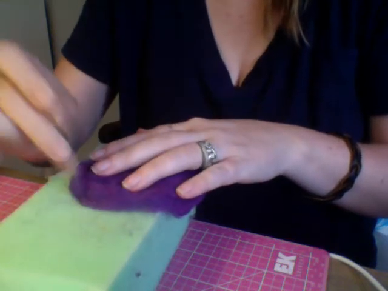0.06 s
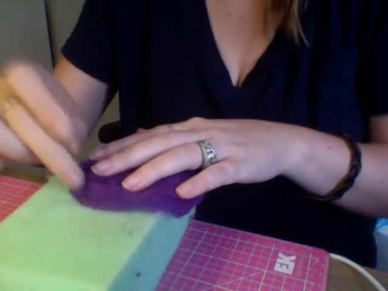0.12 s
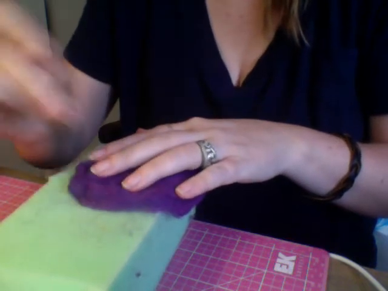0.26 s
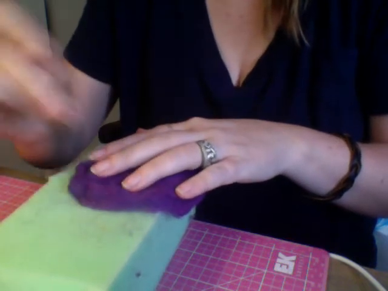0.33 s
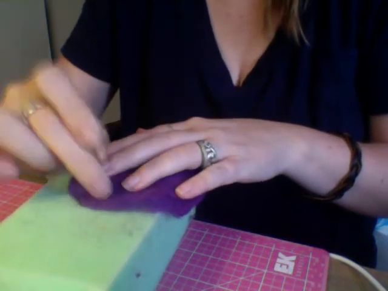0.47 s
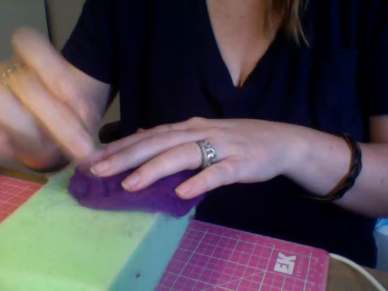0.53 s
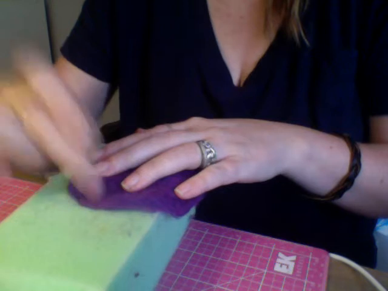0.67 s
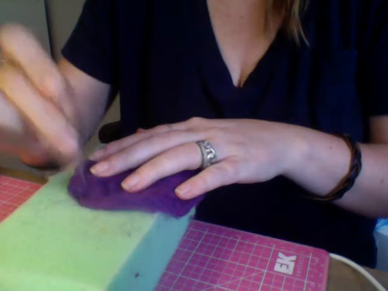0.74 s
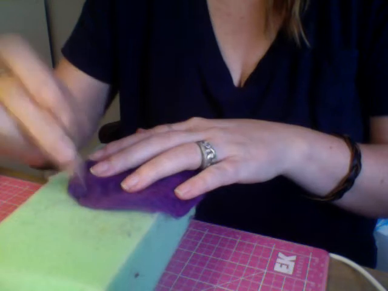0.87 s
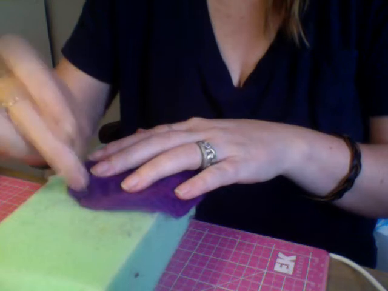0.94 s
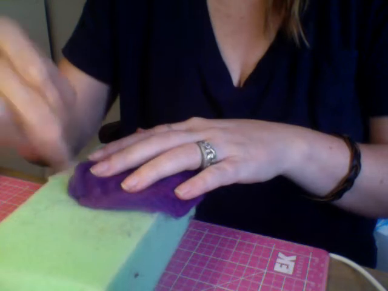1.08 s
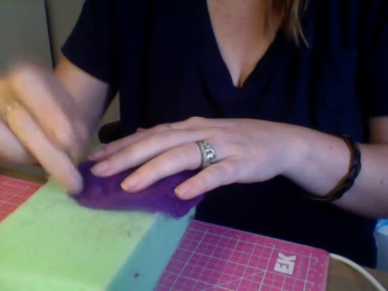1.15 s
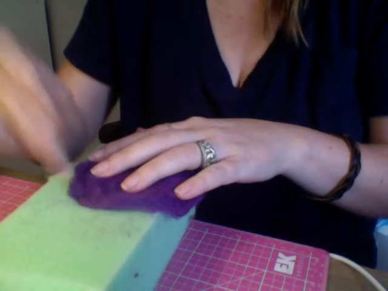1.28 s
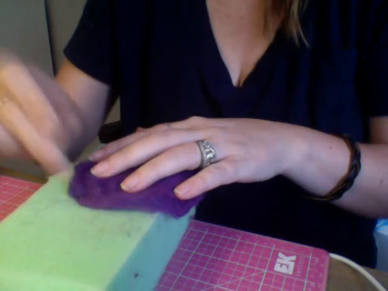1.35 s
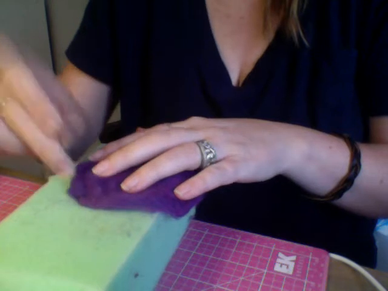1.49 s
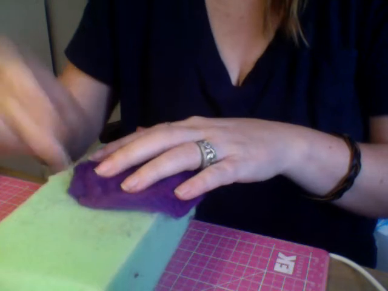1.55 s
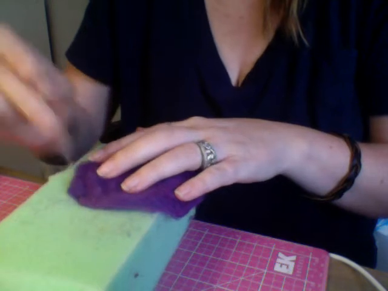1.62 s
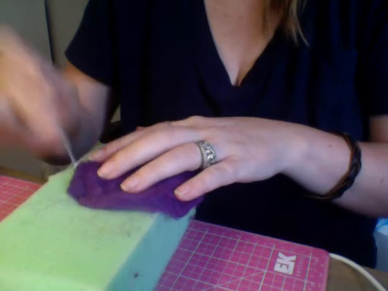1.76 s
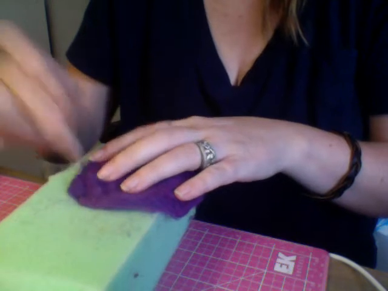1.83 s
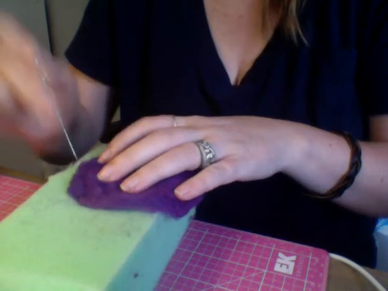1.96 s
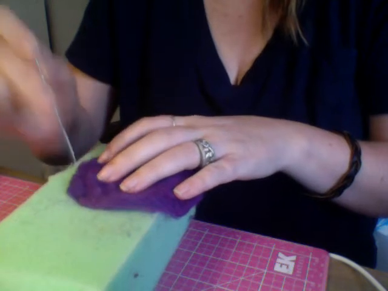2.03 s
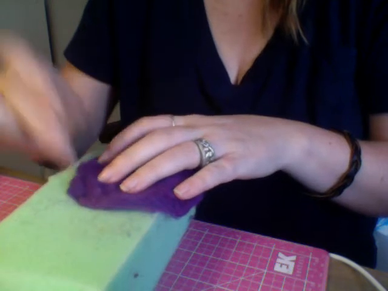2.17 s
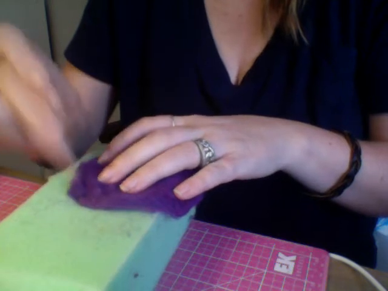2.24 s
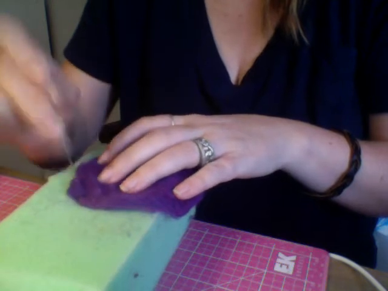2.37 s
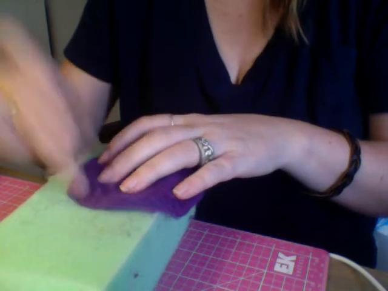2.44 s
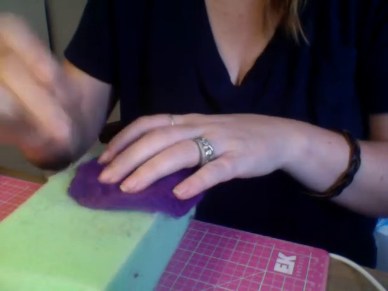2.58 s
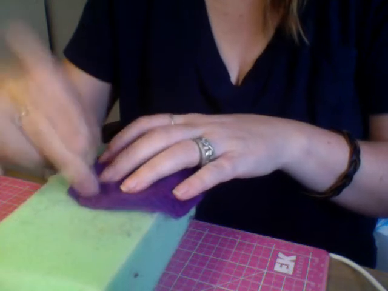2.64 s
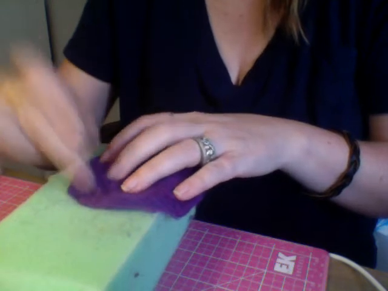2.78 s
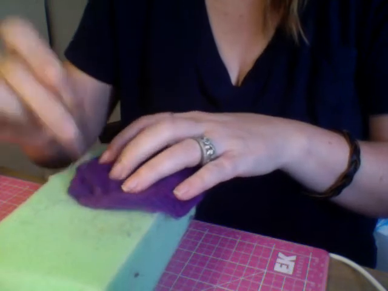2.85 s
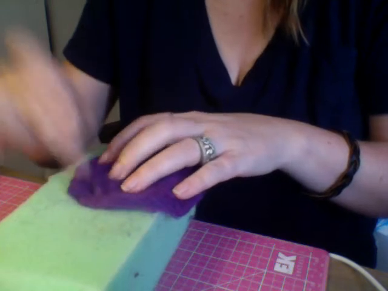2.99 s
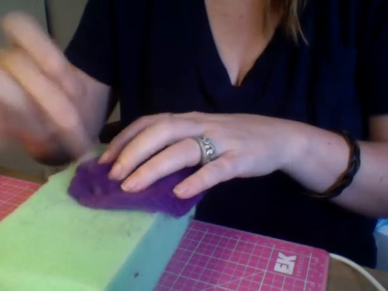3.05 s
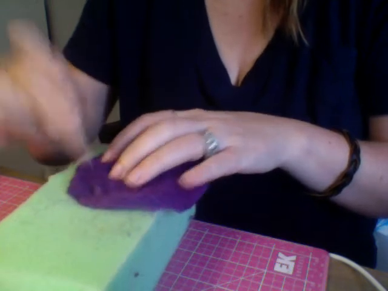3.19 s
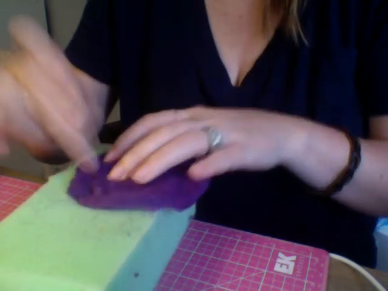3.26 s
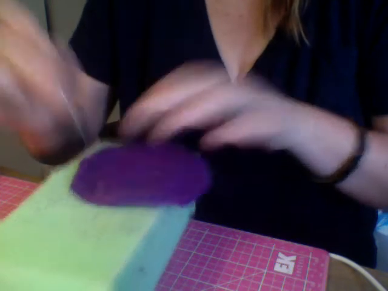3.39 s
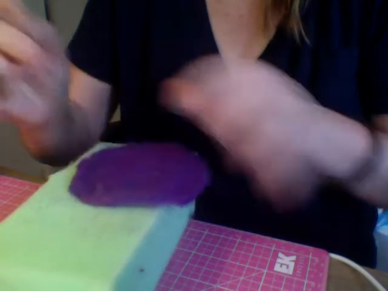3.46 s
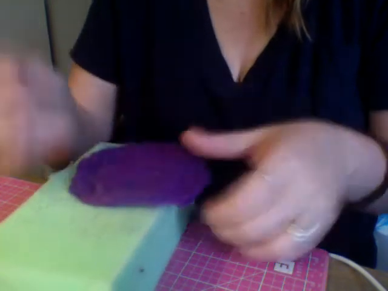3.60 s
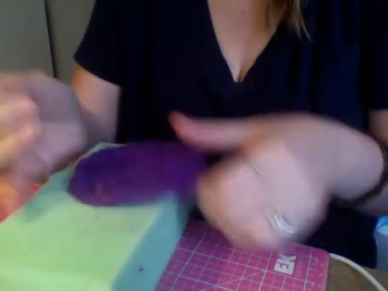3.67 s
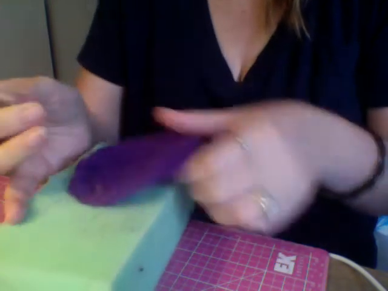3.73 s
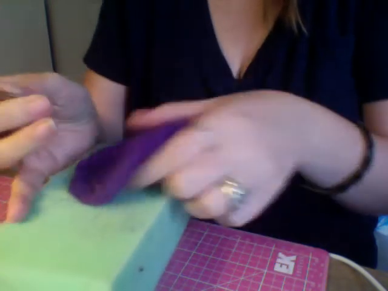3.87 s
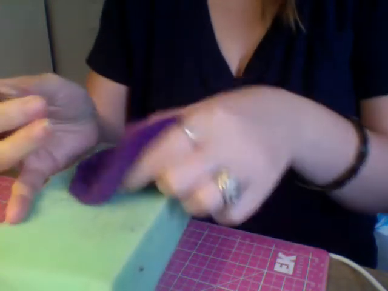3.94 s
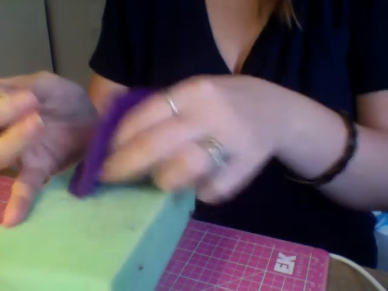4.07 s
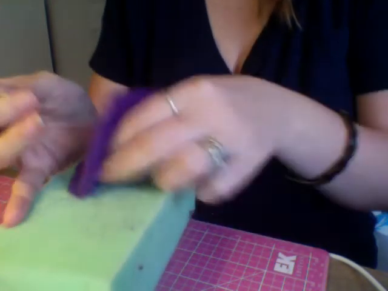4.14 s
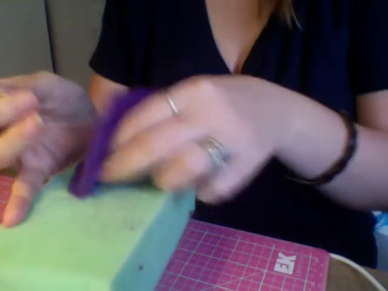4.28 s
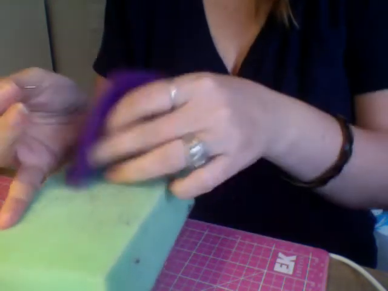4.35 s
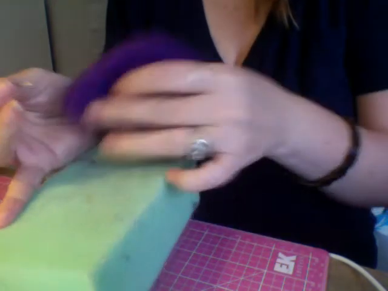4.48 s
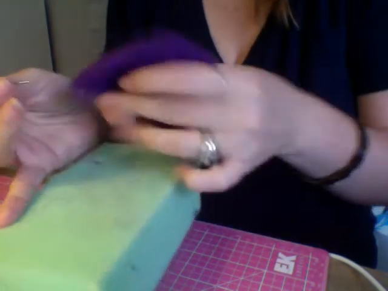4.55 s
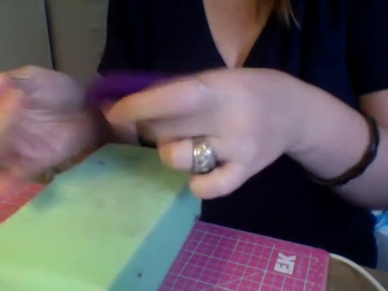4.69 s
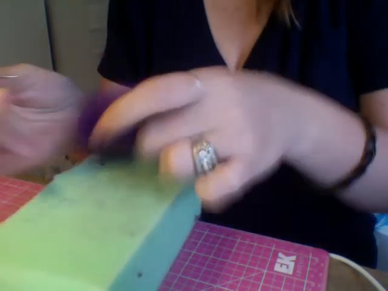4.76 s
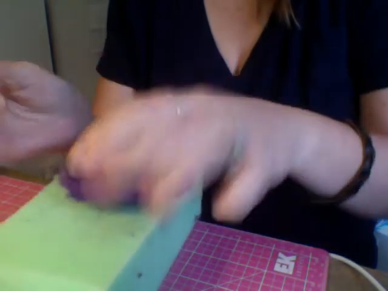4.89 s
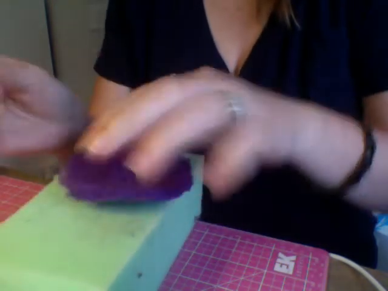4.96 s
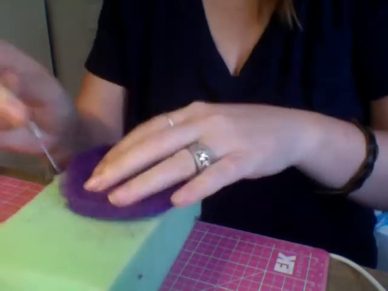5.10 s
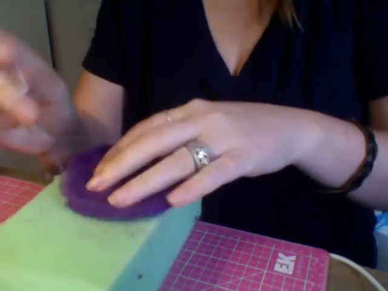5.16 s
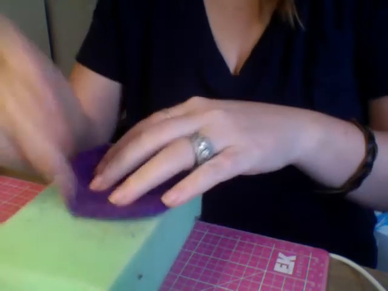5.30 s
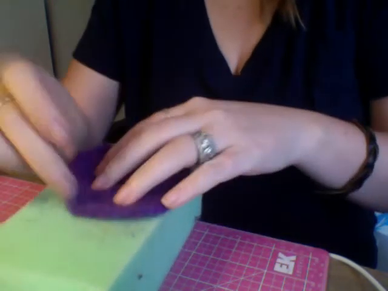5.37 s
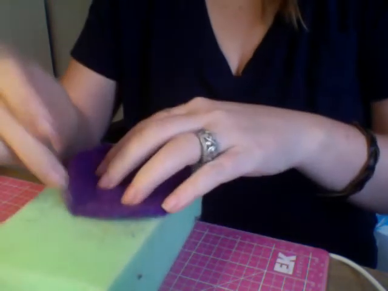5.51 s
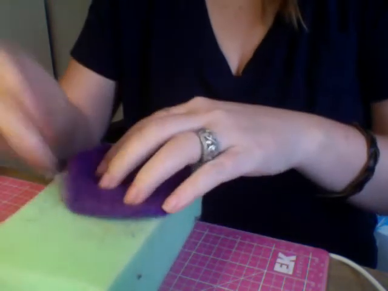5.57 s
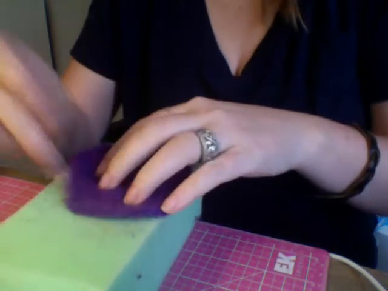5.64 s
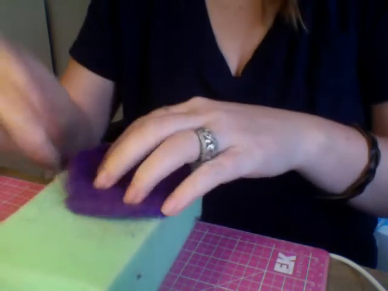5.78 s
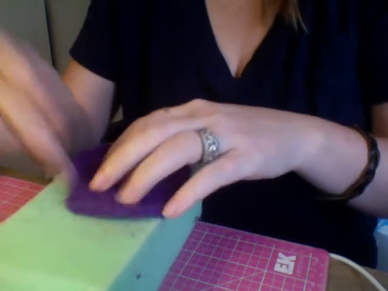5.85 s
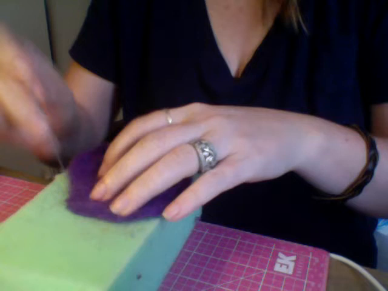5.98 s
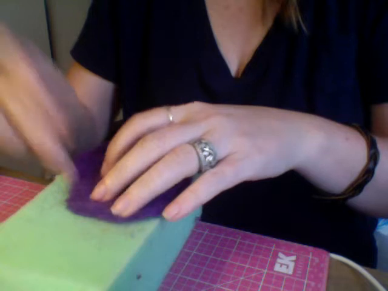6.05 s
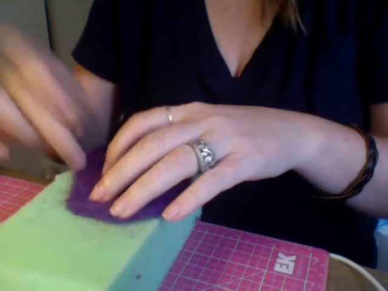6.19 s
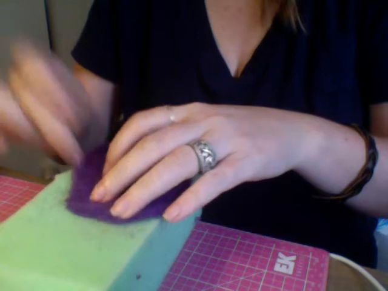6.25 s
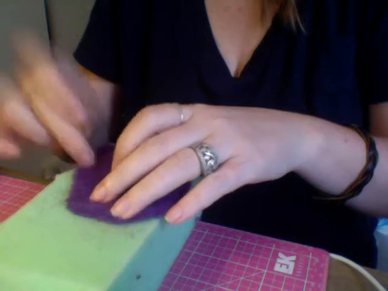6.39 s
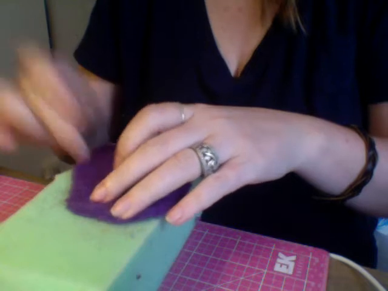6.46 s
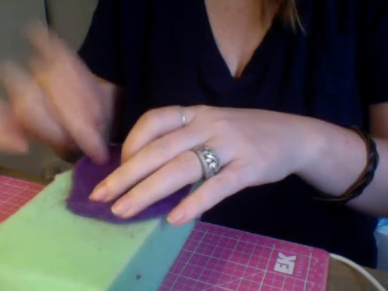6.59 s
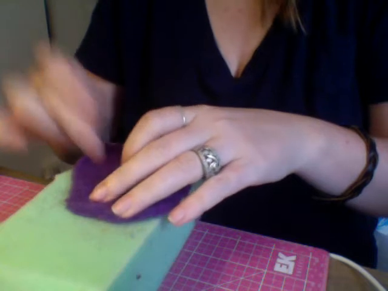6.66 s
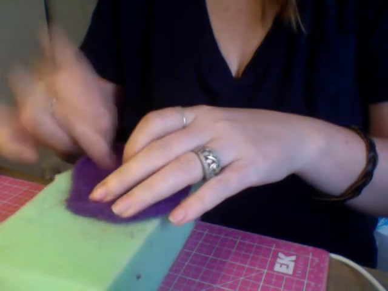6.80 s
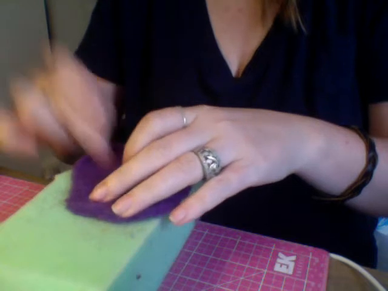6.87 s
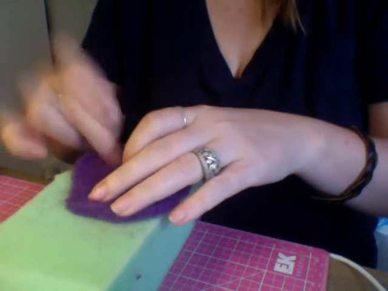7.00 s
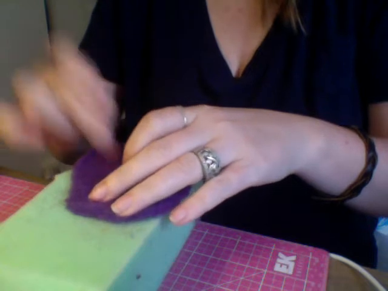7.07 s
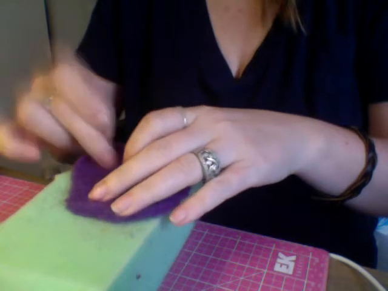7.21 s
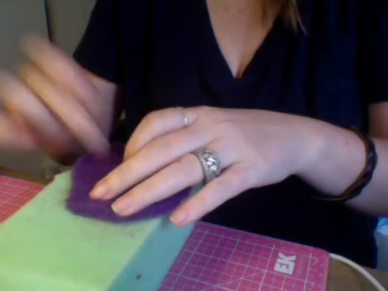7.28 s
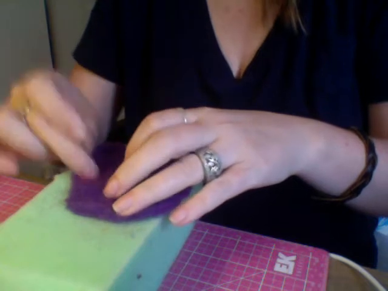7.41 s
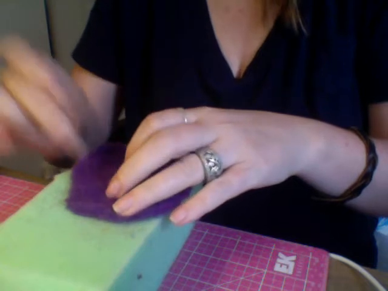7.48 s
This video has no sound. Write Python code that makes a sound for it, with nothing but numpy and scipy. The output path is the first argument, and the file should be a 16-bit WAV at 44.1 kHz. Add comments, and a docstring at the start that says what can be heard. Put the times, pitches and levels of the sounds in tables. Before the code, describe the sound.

Rapid dry crunching punctures through felted wool into foam, soft scrapes between them, a short near-quiet gap, then more stabbing over faint hiss.

```python
"""Crisp crunching stabs, about five a second, from a barbed needle driven through wool into a foam pad on a table.
Each push is a burst of tiny tears and lone snaps that rings resonances of table, pad and foam cells.
Each pull-out is a softer scrape of the same pad and cells, and on some a snagged barb scrapes at a pitch.
In a pause a hand knocks the table with blunt clicks, and wool peels off the pad as gritty noise.
A small microphone adds a coloured noise hiss below."""
import sys
import numpy as np
from scipy import signal
from scipy.fft import rfft, irfft
from scipy.io import wavfile
from scipy.ndimage import uniform_filter1d

SR = 44100
rng = np.random.default_rng(int(sys.argv[2]) if len(sys.argv) > 2 else 0)


def wav_record(signal):
    """Record a signal, one row per channel, as 16-bit PCM in the file named by sys.argv[1]."""
    frames = np.transpose(np.atleast_2d(signal))
    bounded = np.clip(frames, -1, 1)
    # unit amplitude maps onto the largest positive 16-bit level
    quanta = np.round(bounded * 32767).astype(np.int16)
    wavfile.write(sys.argv[1], SR, quanta)


N = 332073

# Needle stabs. Each row: time the tip enters in s, push length in s, first bite against the rest in dB,
# base levels in dB of table, pad, crunch, fizz and pull-out (the envelopes add their own offsets),
# favoured pitch of the pad in Hz, favoured pitch of the crunch in Hz.
STABS = [(0.165, 0.039, 6, -43, -39, -40.5, -44.5, -56, 580, 2760),
         (0.348, 0.034, 0, -41, -37, -38, -42.5, -53.5, 766, 2500),
         (0.532, 0.034, 1, -38.5, -40, -40.5, -45, -56, 800, 2650),
         (0.695, 0.033, -1.5, -41.5, -40.5, -43.5, -59.5, -57.5, 820, 2500),
         (0.872, 0.034, -3.5, -41, -37, -38.5, -46, -57, 820, 2670),
         (1.062, 0.032, 5, -41, -40, -41.5, -52, -59, 570, 2400),
         (1.249, 0.038, 9, -44.5, -41.5, -40.5, -51.5, -56, 530, 2150),
         (1.44, 0.037, 1, -40.5, -40, -42, -62, -57.5, 860, 2340),
         (1.627, 0.039, -1, -36.5, -40.5, -46.5, -63, -59, 910, 2200),
         (1.877, 0.033, -0.5, -42.5, -36, -40, -56.5, -58, 628, 2000),
         (2.059, 0.034, 2.5, -41.5, -38, -41.5, -52, -57, 713, 2200),
         (2.247, 0.04, 1.5, -40.5, -38.5, -39, -41, -54, 810, 3150),
         (2.447, 0.039, 3, -40.5, -41.5, -38.5, -42.5, -56, 810, 2700),
         (2.642, 0.037, 3.5, -45, -42, -42, -47, -57.5, 890, 2600),
         (2.84, 0.035, 3, -45.5, -43.5, -39.5, -46.5, -58.5, 950, 2380),
         (3.025, 0.032, 1, -45, -46.5, -42.5, -61, -61, 910, 1970),
         (5.09, 0.033, 4, -46, -45, -46, -55.5, -62, 810, 3200),
         (5.258, 0.027, 1, -45.5, -43, -48, -57, -60, 830, 2800),
         (5.429, 0.034, 6.5, -45, -50, -41.5, -43.5, -57, 840, 3140),
         (5.621, 0.039, 10.5, -45, -43, -42.5, -55, -57, 840, 3100),
         (5.809, 0.036, 9, -44, -39, -40.5, -47.5, -53, 650, 2470),
         (6.002, 0.035, 7, -45, -40.5, -44.5, -56.5, -57.5, 555, 2300),
         (6.191, 0.037, 5.5, -43, -46.5, -41, -47.5, -56.5, 527, 2100),
         (6.405, 0.033, 2.5, -38.5, -40.5, -41.5, -49.5, -56, 730, 2280),
         (6.597, 0.035, 5.5, -43, -41, -39, -42, -57.5, 910, 2400),
         (6.791, 0.036, -0.5, -37.5, -38.5, -39, -49, -55, 775, 2200),
         (6.98, 0.035, 0, -39, -40.5, -40.5, -51.5, -55, 810, 2700),
         (7.163, 0.04, 2.5, -34.5, -45, -40.5, -49.5, -55.5, 910, 2340),
         (7.352, 0.036, 0.5, -41, -38.5, -41.5, -62, -58, 700, 1970)]
# Resonances of table top, its deep modes, pad, foam-cell crunch, rasp and fizz.
# Each row: frequency in Hz, bandwidth in Hz, level against the other modes in dB.
TABLE_MODES = [(215.6, 31, 0), (266, 31, -4.5), (291, 64.6, -5), (365, 120, -17.5)]
DEEP_MODES = [(104.2, 13, -1.2), (127.7, 17, 0.062)]
PAD_MODES = [(497, 93, -1), (607, 111, 1.5), (672.7, 142, -1), (838.2, 51, 1), (982, 88, -4),
             (1220, 275, -9.5)]
CRUNCH_MODES = [(1773, 346, -3), (2012, 238, -0.5), (2368, 350, -1.5), (2774, 304, 0), (3125, 446, -2.5),
                (3530, 360, -1.5), (4030, 940, -5)]
RASP_MODES = [(5244, 1200, -5), (6280, 190, 2.5), (6292, 255, 4.5)]
FIZZ_MODES = [(7150, 1500, -1), (9620, 960, -0.5), (11850, 1800, -0.5), (14000, 300, -6),
              (14600, 1400, -0.5)]
TABLE_PEAK, BITE_PEAK, TREBLE_PEAK = 0.57, 0.56, 0.73   # share of the push at which each is strongest
OUT_AFTER_S = 0.11   # the tip is free again this long after entering
DEEP_UNDER_TABLE_DB = -10   # the deep modes follow the table
RASP_DB, RASP_FOLLOWS = -51.5, 0.32   # base level at mean fizz; share of the fizz's swing
PULL_PAD_HZ, PULL_CRUNCH_HZ = 920, 1810   # favoured pitches on the way out


def needle():
    """Source and resonator: coarse tears shake table and pad, fine ones crunch and rasp, the fizz peaks late."""
    shove = even(rms_one(soft(tears(700, spread_db=2.5), hz=460)), span_s=0.0158)
    coarse = even(tears(1500, spread_db=4.0), span_s=0.016)
    fine = even(tears(6000, spread_db=4.5), span_s=0.012)
    finest = even(tears(8000, spread_db=5.0), span_s=0.013)
    drag = tears(2000, spread_db=1.0)

    deep = push(stab("table") + DEEP_UNDER_TABLE_DB, TREBLE_PEAK,
                touch_db=-44, entry_db=-23.5, top_db=-11, end_db=-25, fade_s=0.085)
    table = push(stab("table"), TABLE_PEAK,
                 touch_db=-65, entry_db=-14.5, top_db=-9, end_db=-18, fade_s=0.053)
    pad = push(stab("pad"), BITE_PEAK,
               touch_db=-10.5, entry_db=2.5, top_db=7, end_db=-1.0, fade_s=0.043)
    crunch = push(stab("crunch"), BITE_PEAK,
                  touch_db=-22.5, entry_db=-4.0, top_db=7.5, end_db=-0.5, fade_s=0.038)
    rasp_db = RASP_DB + RASP_FOLLOWS * (stab("fizz") - stab("fizz").mean())
    rasp = push(rasp_db, TREBLE_PEAK,
                touch_db=-75, entry_db=-22.5, top_db=5.0, end_db=-3.5, fade_s=0.088)
    fizz = push(stab("fizz"), TREBLE_PEAK,
                touch_db=-50, entry_db=-27.5, top_db=-5, end_db=-11.5, fade_s=0.072)
    pad_out = pull(start_db=-1.0, turn_db=-2.3, end_db=-8.5)
    crunch_out = pull(start_db=10.5, turn_db=-0.6, end_db=-6.5)

    # the table radiates little under its lowest mode
    below_modes = signal.butter(4, 85, "high", fs=SR, output="sos")
    thump = body(shove, DEEP_MODES, deep) + body(shove, TABLE_MODES, table)
    going_in = (signal.sosfilt(below_modes, thump)
                + soft(body(coarse, PAD_MODES, pad, held("pad_hz"), narrow_db=12.5, flicker_db=2.3), hz=2400)
                + soft(body(fine, CRUNCH_MODES, crunch, held("crunch_hz"), narrow_db=7.5, flicker_db=1.5),
                       hz=5600)
                + soft(body(fine, RASP_MODES, rasp, flicker_db=2.5), hz=8500)
                + body(finest, FIZZ_MODES, fizz, flicker_db=5.5))
    pad_scrape = body(drag, PAD_MODES, pad_out, PULL_PAD_HZ, narrow_db=2, flicker_db=3.5)
    cell_scrape = body(drag, CRUNCH_MODES, crunch_out, PULL_CRUNCH_HZ, narrow_db=7.5, flicker_db=3.5)
    coming_out = body(drag, TABLE_MODES, pad_out) + soft(pad_scrape, hz=2500) + soft(cell_scrape, hz=5000)
    return going_in + coming_out


def push(levels_db, peak, touch_db, entry_db, top_db, end_db, fade_s):
    """Force envelope going in: a touch on the wool, the bite, a swell, a sag as the hand slows, a fade."""
    shapes = []
    for s, length, bite, db in zip(stab("enter"), stab("length"), stab("bite"), levels_db):
        times = s + np.array([-.018, -.0015, .0005, peak * length, length, length + fade_s])
        # the touch is louder before a soft bite
        shape_db = np.array([touch_db - 2.1 * bite - 16, touch_db - 0.88 * bite, entry_db + bite,
                             top_db, end_db, end_db - 53])
        shapes.append((times, db + shape_db))
    return strokes(shapes)


def pull(start_db, turn_db, end_db):
    """Friction envelope coming out: a lull as the hand turns, then the barbs drag until the tip is free."""
    shapes = []
    for s, length, db in zip(stab("enter"), stab("length"), stab("pull")):
        times = s + np.array([length - .005, length + 0.0016, length + 0.035,
                              OUT_AFTER_S - .03, OUT_AFTER_S - .006, OUT_AFTER_S + 0.017])
        shapes.append((times, db + np.array([-20, start_db, turn_db, end_db + 3.5, end_db, end_db - 9])))
    return strokes(shapes)


def stab(name):
    """Indexing: one column of the stab table."""
    names = "enter length bite table pad crunch fizz pull pad_hz crunch_hz".split()
    return np.transpose(STABS)[names.index(name)]


def held(name):
    """Sample and hold: a value of each stab, kept until 25 ms before the next."""
    return stab(name)[np.maximum(np.searchsorted(stab("enter") - .025, np.arange(N) / SR) - 1, 0)]


# The clearest single barbs and fibres that snap. Each row: time in s, click strength in dB, pitch in Hz,
# jolt into the pad in dB (both strengths before the common gains in the function).
SNAPS = [(0.1677, -55, 2500, -27), (0.1907, -45, 2280, -18.5), (0.35, -32, 2970, -34),
         (0.3795, -27, 3470, -26), (0.5351, -40, 3470, -19.5), (0.5449, -25.5, 3600, -17),
         (0.708, -25, 2960, -32), (0.7161, -34, 2600, -24), (0.8849, -26, 2370, -38),
         (0.8935, -32, 3700, -21), (1.2521, -22.5, 2450, -23), (1.2615, -20, 2540, -30),
         (1.4445, -33, 3740, -59), (1.4507, -25.5, 2320, -39), (1.6384, -27, 2290, -25),
         (1.6478, -23, 2500, -35), (1.8804, -26, 2960, -24), (1.8905, -28.5, 2720, -23.5),
         (2.0813, -32, 2700, -21.5), (2.2786, -25.5, 2820, -47), (2.4491, -23.5, 3350, -30),
         (2.6522, -31, 3200, -29), (2.8549, -28, 1990, -26.5), (3.0541, -27.5, 2690, -37),
         (4.0614, -39, 2940, -55), (4.0736, -45, 3850, -60), (4.0871, -48, 2430, -55),
         (4.614, -58, 5200, -51), (5.2135, -48, 3300, -52), (5.2745, -35, 2810, -29),
         (5.4346, -24.5, 3060, -21.5), (5.448, -24.5, 1910, -23.5), (5.6249, -25, 1790, -33),
         (5.6536, -28.5, 4170, -36), (5.8124, -35, 2350, -18.5), (5.8184, -24.5, 3520, -31),
         (5.8273, -25, 1960, -15.5), (5.9306, -45, 3060, -41), (6.0079, -26, 2050, -24.5),
         (6.0148, -21.5, 2020, -35), (6.1954, -23.5, 2390, -59), (6.211, -23, 2360, -36),
         (6.4295, -24.5, 2320, -33), (6.8097, -28, 2650, -27), (6.992, -19.5, 2120, -35),
         (7.1748, -21.5, 2400, -26), (7.181, -18, 2100, -55), (7.2949, -30.5, 2150, -43),
         (7.3628, -22, 2230, -30)]


def snaps():
    """Impulse response: lone sharp clicks ring the foam cells nearest their pitch and the pad."""
    clicks, pitch_hz, jolts = np.zeros(N), np.ones(N), np.zeros(N)
    for s, level_db, hz, pad_db in SNAPS + stray_snaps():
        at = round(s * SR)
        clicks[at], pitch_hz[at], jolts[at] = from_db(level_db), hz, from_db(pad_db)
    cells = body(clicks, CRUNCH_MODES + RASP_MODES, from_db(18.5), pitch_hz, narrow_db=46.5)
    pad = body(jolts, PAD_MODES, from_db(16.0), held("pad_hz"), narrow_db=16.0)
    return soft(cells, hz=6040) + soft(pad, hz=1850)


STRAY_OVER_CRUNCH_DB, STRAY_JOLT_OVER_PAD_DB, STRAY_SPREAD_DB = 6, 2.5, 4


def stray_snaps():
    """Random fracture: one lesser snap at a chance moment of each push, near the pitch of its crunch."""
    when = rng.uniform(0.1033, 0.98, len(STABS))   # share of the push
    luck = rng.standard_normal((len(STABS), 3))
    return list(zip(stab("enter") + when * stab("length"),
                    stab("crunch") + STRAY_OVER_CRUNCH_DB + STRAY_SPREAD_DB * luck[:, 0],
                    stab("crunch_hz") * 2 ** (0.46 * luck[:, 1]),
                    stab("pad") + STRAY_JOLT_OVER_PAD_DB + STRAY_SPREAD_DB * luck[:, 2]))


# Barbs that snag on the way out and scrape briefly.
# Each row: start in s, length in s, level in dB, pitch in Hz.
SNAGS = [(0.442, 0.042, -54, 800), (0.616, .03, -55, 800), (0.947, 0.041, -57, 840),
         (0.943, .03, -54, 2900), (1.125, 0.04, -59, 2900), (1.5, .04, -58, 2500),
         (1.959, 0.04, -52.5, 800), (2.135, .03, -57, 820), (5.336, .03, -67, 3400),
         (5.497, .05, -57, 3300), (5.87, 0.072, -48.5, 860), (7.24, 0.08, -54, 2270)]
SNAG_EDGE_S = .008   # rise before the start, and fall at the end


def snags():
    """Selective resonance: dense tears ring mostly the modes near the snag's pitch."""
    out, scrape = 0, tears(3000, spread_db=1.0)
    for modes in (PAD_MODES, CRUNCH_MODES):
        rows = [row for row in SNAGS if modes[0][0] <= row[3] <= modes[-1][0]]
        shapes = []
        for s, length, db, _ in rows:
            times = s + np.array([-SNAG_EDGE_S, 0, length - SNAG_EDGE_S, length])
            shapes.append((times, db + np.array([-14, -1.5, 1.5, -14])))
        starts, hz = np.transpose(rows)[[0, 3]]
        # each pitch holds until 20 ms before the next snag
        pitch_hz = hz[np.maximum(np.searchsorted(starts - .02, np.arange(N) / SR) - 1, 0)]
        out = out + body(scrape, modes, strokes(shapes), pitch_hz, narrow_db=32)
    return out


# Hand against the table. Each row: time in s, blow into the table in dB, into its deep modes in dB,
# into the pad in dB.
KNOCKS = [(3.167, -65.5, -69.5, -86), (3.185, -66, -89, -91), (3.241, -78, -94, -90),
          (3.367, -51, -59, -63), (3.377, -55.5, -58.5, -61), (3.418, -70, -67, -76),
          (3.467, -73, -73, -92), (4.081, -76, -78.5, -90)]


def knocks():
    """Soft impact: a low-passed click rings the table, its deep modes and the low modes of the pad."""
    t, out = np.arange(400) / SR, 0
    contact = rms_one(t * np.exp(-2 * np.pi * 500 * t))
    for column, modes in enumerate([TABLE_MODES, DEEP_MODES, PAD_MODES[:3]], 1):
        blows = np.zeros(N)
        for row in KNOCKS:
            blows[round(row[0] * SR):][:400] += from_db(row[column]) * contact
        out = out + body(blows, modes)
    return soft(out, hz=1100)


# Wool peeled off the foam. Each row: time in s, level in dB.
PEEL = [(4.025, -76), (4.04, -63.5), (4.07, -52), (4.095, -60), (4.105, -61), (4.125, -60), (4.17, -68.5),
        (4.2, -80)]
# Resonances of the wool. Each row: frequency in Hz, bandwidth in Hz, level against the other modes in dB.
WOOL_MODES = [(990, 370, 7.5), (2260, 160, 6), (2850, 440, 5), (3930, 200, 4), (5430, 500, -18)]


def peel():
    """Granular release: fibres let go of the foam in a gritty brush, with separate ticks high up."""
    level = strokes([np.transpose(PEEL)])
    grit, ticks = tears(1200, spread_db=2.0), tears(600, spread_db=0.0)
    brush = soft(body(grit, WOOL_MODES, level, flicker_db=3.0), hz=6050)
    return brush + body(ticks, FIZZ_MODES, from_db(-23) * level)


# Background hiss, lower while the work rests. Each row: time in s, level in dB.
HISS = [(0, -64.5), (3.1, -63.5), (3.8, -67.5), (4.05, -68.5), (4.2, -66), (4.85, -69.5), (5.08, -70.5),
        (5.25, -64.5), (7.53, -63.5)]
# Colour of the hiss. Each row: frequency in Hz, relative density in dB per Hz.
HISS_COLOUR = [(18, -50), (30, -29), (103, -2), (280, -0.5), (540, -9), (889, -9), (1070, -12.5),
               (2480, -15.5), (9220, -28.5), (14800, -35.5), (16000, -40)]


def hiss():
    """Spectral shaping: white noise coloured by a curve with straight pieces on a log-frequency axis."""
    hz = np.maximum(np.fft.rfftfreq(N, 1 / SR), 1)
    colour_hz, colour_db = np.transpose(HISS_COLOUR)
    gain = from_db(np.interp(np.log(hz), np.log(colour_hz), colour_db))
    noise = irfft(rfft(rng.standard_normal(N)) * gain, N)
    return rms_one(noise) * strokes([np.transpose(HISS)])


def body(x, modes, strength=1, favour_hz=None, narrow_db=0, flicker_db=0):
    """Modal superposition: parallel resonances; white noise of rms 1 comes out at about rms 1.

    Modes lose narrow_db of drive per octave from the favoured pitch; each one's drive flickers on its own."""
    probe = np.zeros(8192)
    probe[0] = 1
    out, click = 0, 0
    for k, (hz, width, level_db) in enumerate(modes):
        r = np.exp(-np.pi * max(width, 5) / SR)   # pole radius from the bandwidth
        # neighbouring modes alternate in sign
        b = from_db(level_db) * (1 - r * r) / 2 * (-1) ** k * np.array([1, 0, -1])
        a = [1, -2 * r * np.cos(2 * np.pi * hz / SR), r * r]
        drive_db = flicker_db * flicker(step_s=.012) if flicker_db else 0
        if favour_hz is not None:
            drive_db = drive_db - narrow_db * np.abs(np.log2(hz / favour_hz))
        out = out + signal.lfilter(b, a, x * strength * from_db(drive_db) + 1e-18)
        click = click + signal.lfilter(b, a, probe)
    return out / np.sqrt(np.sum(click ** 2))


def tears(per_s, spread_db):
    """Shot noise: random clicks of sign + or - at a mean rate, sizes spread in dB; rms 1."""
    sizes = from_db(spread_db * np.minimum(rng.exponential(1, N), 4)) * rng.choice([-1, 1], N)
    return rms_one(sizes * (rng.random(N) < per_s / SR))


def strokes(shapes):
    """Amplitude modulation: the sum of envelopes, each given as (times in s, levels in dB)."""
    out = np.zeros(N)
    for times, levels_db in shapes:
        times = np.maximum.accumulate(times)
        span = np.arange(max(int(times[0] * SR), 0), min(int(times[-1] * SR), N))
        out[span] += from_db(np.interp(span / SR, times, levels_db))
    return out


def flicker(step_s):
    """Slow random modulation: values of spread 1 joined by straight lines."""
    return np.interp(np.arange(N) / SR / step_s, np.arange(1500), rng.standard_normal(1500))


def soft(x, hz):
    """Contact compliance: yielding fibres make blunt clicks, a low-pass."""
    return signal.sosfilt(signal.butter(2, hz, fs=SR, output="sos"), x + 1e-18)


def even(x, span_s):
    """Short-time levelling: evens out the tears, so that every stab shoves as hard as the hand does."""
    return x / np.sqrt(uniform_filter1d(x ** 2, size=int(span_s * SR)) + 0.019)


def from_db(db):
    """Logarithmic level: decibels to gain."""
    return 10 ** (np.asarray(db) / 20)


def rms_one(x):
    """Normalisation: scale to rms 1."""
    return x / np.sqrt(np.mean(x ** 2) + 1e-20)


def scene():
    """Linear superposition: needle, hands and hiss on one channel."""
    return (needle() + snaps() + snags() + knocks() + peel() + hiss())[None]


def record(dry):
    """Band limiting: the small microphone drops the deep bass; the top is cut steeply."""
    thin = signal.sosfilt(signal.butter(2, 45, "high", fs=SR, output="sos"), dry)
    return signal.sosfilt(signal.ellip(12, .5, 70, 15850, fs=SR, output="sos"), thin)


dry = scene()
out = record(dry)
wav_record(out)
```